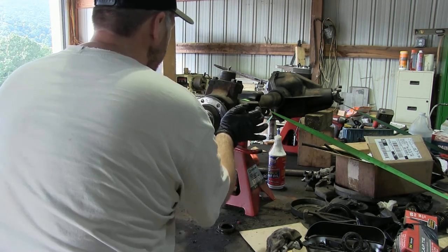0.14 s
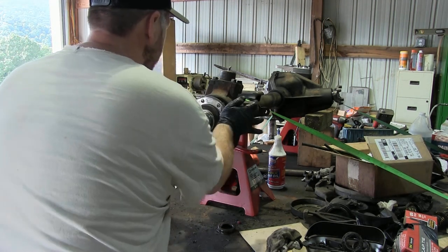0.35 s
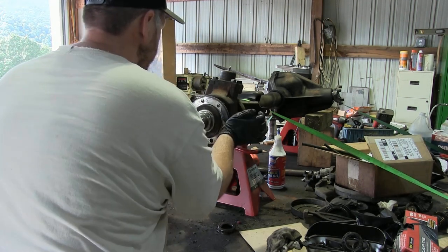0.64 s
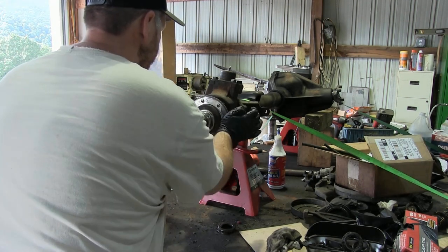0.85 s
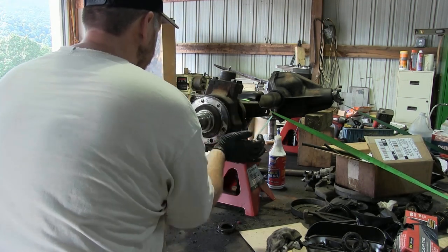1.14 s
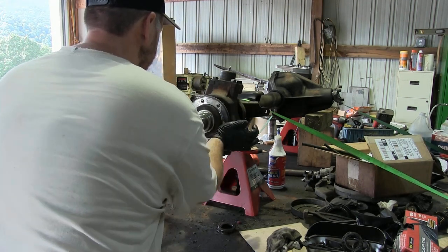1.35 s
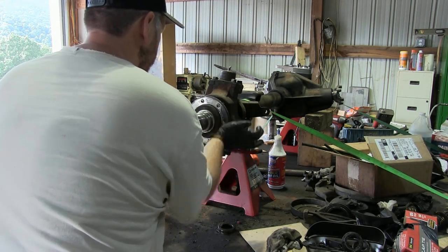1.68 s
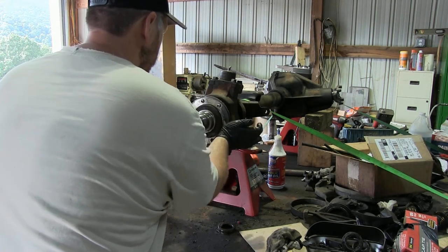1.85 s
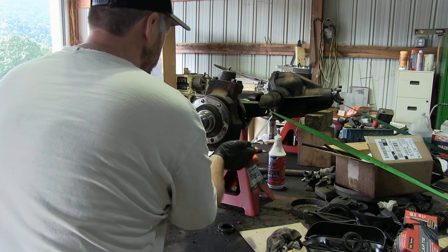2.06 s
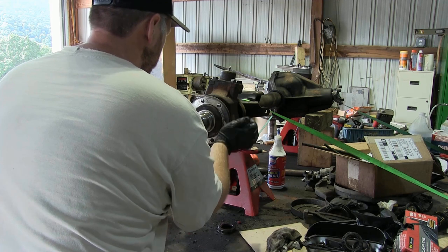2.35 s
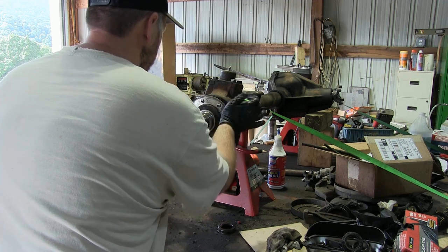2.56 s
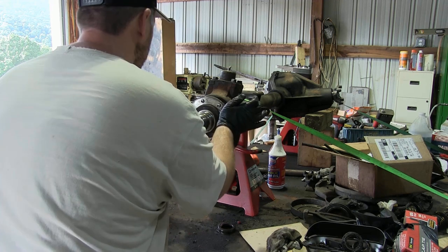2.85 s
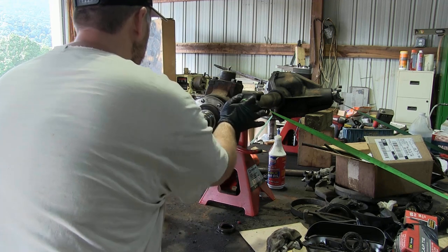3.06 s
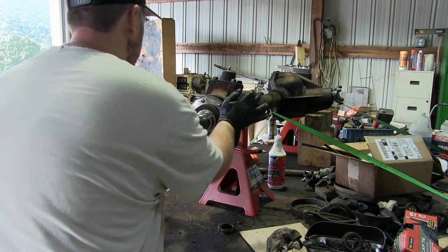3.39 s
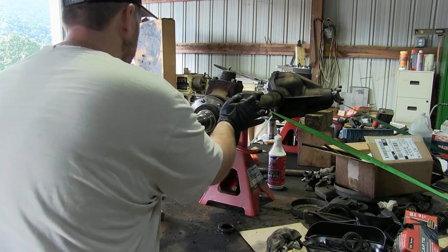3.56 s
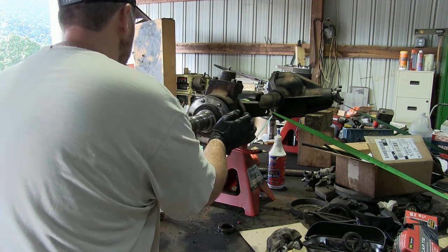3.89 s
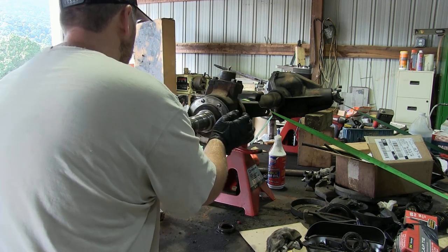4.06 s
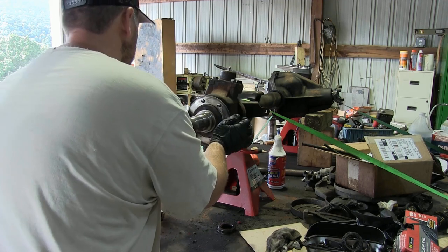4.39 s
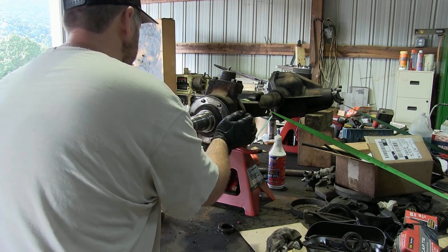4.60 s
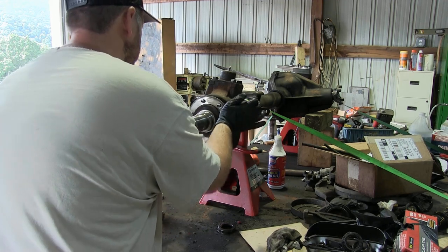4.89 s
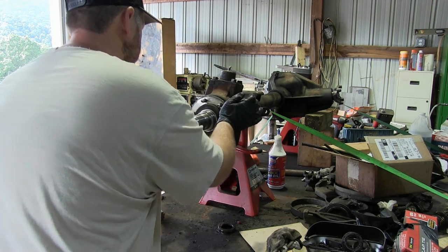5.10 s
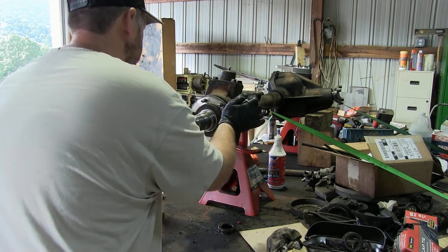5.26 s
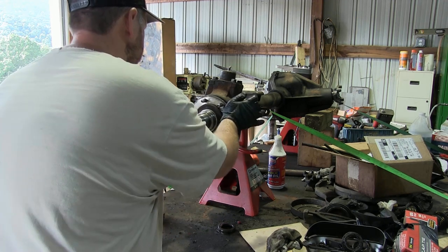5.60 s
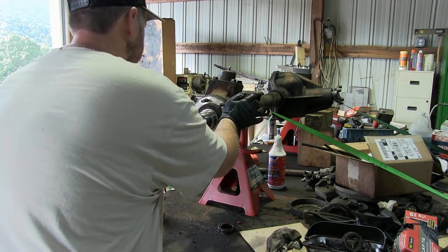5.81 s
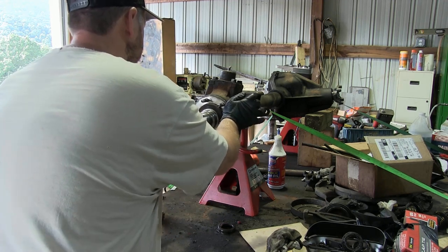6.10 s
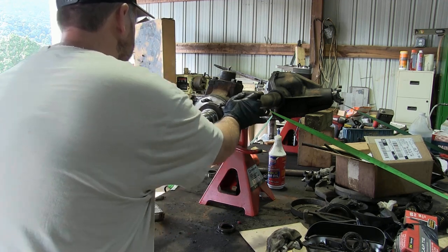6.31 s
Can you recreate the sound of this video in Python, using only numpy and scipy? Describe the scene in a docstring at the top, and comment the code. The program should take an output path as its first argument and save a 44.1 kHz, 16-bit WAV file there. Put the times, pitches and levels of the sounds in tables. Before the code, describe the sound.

Over a steady hiss and a faint hum, heavy steel parts knock together in a reverberant metal shed, heard from nearby. Irregular clunks, often in quick pairs, set an axle housing booming and a hub ringing briefly as it is worked into place. Light scuffs and soft metal rubbing come between them. Near the end a strong triple clunk starts a quicker run of lighter knocks, the last dying into the hiss.

```python
"""A heavy steel hub is pushed and rocked onto a truck axle that rests on stands in a sheet-metal workshop.
A steady hiss and a faint hum are heard from the start. Each shove takes up the play with a tick, then
lands as a clunk, often twice: the impact excites the normal modes of the booming housing and the ringing
steel, and the shed reverberates. From about 3 s faint rubbing joins in at times; after 5 s the blows
crowd together, and the last, light one dies away into the hiss."""
import sys
import numpy as np
from scipy import signal
from scipy.io import wavfile

SR = 44100
rng = np.random.default_rng(int(sys.argv[2]) if len(sys.argv) > 2 else 0)


def log_audio(samples):
    """Write samples as a 16-bit WAV file to the path given in sys.argv[1]."""
    # one column per channel
    frames = np.atleast_2d(samples).T
    # limit to full scale, then quantise
    limited = np.clip(frames, -1, 1)
    pcm = np.round(limited * 32767).astype(np.int16)
    wavfile.write(sys.argv[1], SR, pcm)


N = 284004
TIME, RING_TIME = np.arange(N) / SR, np.arange(int(1.2 * SR)) / SR
BAND_EDGES_HZ = 35 * 2 ** (np.arange(28) / 3)
ANTIPHASE = np.array([[1], [-1]])   # opposite signs on the left and right


def from_db(db):
    """Amplitude ratio: a factor of ten for every 20 dB."""
    return 10 ** (np.asarray(db) / 20)


def at_hz(points, hz):
    """Interpolation on a logarithmic frequency axis."""
    return np.interp(np.log(hz), np.log(np.array(points)[:, 0]), np.array(points)[:, 1])


def decay(t60):
    """Exponential damping: the level falls 60 dB in t60 seconds."""
    return np.exp(-np.log(1000) * RING_TIME / t60)


def rise(time_constant_s):
    """First-order build-up towards full amplitude."""
    return 1 - np.exp(-RING_TIME / time_constant_s)


def add(track, s, sound):
    """Superposition: a sound adds to the track from time s on."""
    start = max(int(s * SR), 0)
    track[:, start:start + sound.shape[-1]] += sound[..., :N - start]


def noise_bands(spectrum, correlation, size):
    """Partially coherent stereo noise as third octaves (centre, band), with a total rms near 1."""
    centres = np.sqrt(BAND_EDGES_HZ[1:] * BAND_EDGES_HZ[:-1])
    gains = from_db(at_hz(spectrum, centres))
    gains /= np.sqrt(np.sum(gains ** 2 * np.diff(BAND_EDGES_HZ)) * 2 / SR)
    white = rng.standard_normal((2, 2, size + SR // 2))
    for k, hz in enumerate(centres):
        sos = signal.butter(2, BAND_EDGES_HZ[k:k + 2], "band", fs=SR, output="sos")
        mid, side = signal.sosfilt(sos, white[k % 2])[:, SR // 2:]
        alike = np.clip(at_hz(correlation, hz), 0, 1)
        mid, side = mid * np.sqrt(1 + alike), side * np.sqrt(1 - alike)
        yield hz, gains[k] * np.array([mid + side, mid - side]) / np.sqrt(2)


def burst(level_db, hz, t60, edge_ratio=1.2, side_share=0.049, rise_share=0.13):
    """A contact transient as damped, band-limited noise; the longer it lasts, the gentler its onset."""
    edges = np.clip([hz / edge_ratio, hz * edge_ratio], 100, .45 * SR)
    sos = signal.butter(3, edges, "band", fs=SR, output="sos")
    envelope = (decay(t60) * rise(rise_share * t60))[:SR // 10]
    mid, side = signal.sosfilt(sos, rng.standard_normal((2, len(envelope))) * envelope)
    gain = from_db(level_db) * np.linalg.norm(envelope) / np.linalg.norm(mid)
    return gain * (mid + side_share * side * ANTIPHASE)


def reverberate(sound, wet_db, t60):
    """Convolution adds the diffuse field of the metal walls, partly coherent between the two sides."""
    left, right, shared = rng.standard_normal((3, len(RING_TIME))) * decay(t60)
    walls = np.array([left, right]) + shared
    walls /= np.linalg.norm(walls, axis=1, keepdims=True)
    return sound + from_db(wet_db) * signal.fftconvolve(sound, walls, axes=1)[:, :N]


# spectrum of the background: (frequency [Hz], relative spectral density [dB])
HISS_SPECTRUM = [(24, -32), (40, -10), (126, -9), (174, -25), (202, -3.5), (438, -15), (472, -3),
                 (548, -10.5), (740, -10.5), (1130, -12), (1280, -20), (2770, -7.5), (5860, -5),
                 (7710, -19), (15500, -34)]
# its left-right likeness: (frequency [Hz], correlation [1])
HISS_CORRELATION = [(100, 0.71), (600, 0.12), (2000, 0.43), (5000, 0.42), (12000, 0.7)]
# its level over time, dipping for a while after 2 s: (time [s], relative level [dB])
HISS_LEVEL = [(0.0, -43.5), (1.74, -43.5), (2.19, -45), (2.58, -45), (3.03, -43.5), (5.56, -43.5),
              (5.74, -41.5), (6.44, -43)]


def hiss(gain_db=3.5):
    """Broadband noise with a continuous spectrum: a bright hiss over a little room rumble."""
    noise = sum(band for _, band in noise_bands(HISS_SPECTRUM, HISS_CORRELATION, size=N))
    course_db = np.interp(TIME, *np.transpose(HISS_LEVEL))
    return from_db(course_db + gain_db) * noise


def hum(hz=477, level_db=-57, waver_hz=2.7):
    """A faint pure tone wavers under slow, random frequency modulation."""
    knots = np.linspace(0, TIME[-1], 60)
    pitch = hz + waver_hz * np.interp(TIME, knots, rng.standard_normal(len(knots)))
    return from_db(level_db) * np.sqrt(2) * np.sin(2 * np.pi * np.cumsum(pitch) / SR)


# sliding while the hub is rocked: (time [s], hold [s], level [dB])
RUBS = [(3.0, .45, -59), (3.52, 0.13, -54), (5.2, 1, -49), (6.15, .3, -51)]


def rubbing(centre_hz=3100, edge_ratio=1.08, side_share=0.64, attack_s=0.17, release_s=0.24):
    """Sliding friction radiates narrow-band noise; each rub swells, holds and fades."""
    sos = signal.butter(2, [centre_hz / edge_ratio, centre_hz * edge_ratio], "band", fs=SR, output="sos")
    mid, side = signal.sosfilt(sos, rng.standard_normal((2, N)))
    swells = [from_db(db) * np.interp(TIME, [s - attack_s, s, s + hold, s + hold + release_s], [0, 1, 1, 0])
              for s, hold, db in RUBS]
    return np.max(swells, axis=0) * (mid + side_share * side * ANTIPHASE) / mid.std()


# steel grazing steel: (time [s], level [dB])
SCUFFS = [(0.915, -46), (2.692, -41), (3.08, -40), (3.502, -40), (5.89, -45)]


def scuffs():
    """Brief friction of steel on steel gives bursts of high-frequency noise."""
    out = np.zeros((2, N))
    for s, level_db in SCUFFS:
        add(out, s, burst(level_db, hz=9900, t60=0.12))
    return out


# loose parts meeting: (time [s], level [dB])
CLACKS = [(0.986, -30), (1.018, -27), (4.4983, -22), (5.5, -25.5), (5.889, -24.5), (6.03, -26)]


def clacks():
    """Light impacts of loose parts give short transients without exciting the housing."""
    out = np.zeros((2, N))
    for s, level_db in CLACKS:
        add(out, s, burst(level_db, hz=1450, t60=0.022))
    return out


# where boom, thud, body, clank and crack lie: (frequency [Hz])
REGISTERS_HZ = [80, 170, 450, 1350, 5000]
ORDINARY_DB = -22   # level of an ordinary blow


def impact_spectrum(hz, level_db, weight_db, hardness_db, rebound):
    """Excitation spectrum relative to a blow's level: weight lifts the thud, hardness the treble."""
    # the stands rock even under a light push, but far less on a rebound
    boom_db = 2 - 0.29 * (level_db - ORDINARY_DB) - (13 if rebound else 0)
    registers_db = [boom_db, weight_db, 0, hardness_db, hardness_db + 4]
    return from_db(np.interp(np.log(hz), np.log(REGISTERS_HZ), registers_db))


def coupling(hz, pitches_hz, boost_db, width_octaves=0.099):
    """Modal coupling: the place of contact drives resonances near two pitches harder than the rest."""
    nearness = np.exp(-.5 * (np.log2(hz[:, None] / pitches_hz) / width_octaves) ** 2)
    return from_db(boost_db * nearness.max(axis=1))


def damped_modes(modes, gains, scatter_db, spread_rad, detune):
    """Free vibration is a sum of damped sines; each blow varies their strength, tuning and stereo phase."""
    hz, db, t60 = np.transpose(modes)
    strength_draw, phase_draw, load_draw = rng.standard_normal((len(hz), 3)).T
    amplitudes = gains * from_db(db + scatter_db * strength_draw)
    hz = hz * (1 + detune * load_draw)
    out = np.zeros((2, len(RING_TIME)))
    for k in range(len(hz)):
        phase = 2 * np.pi * hz[k] * RING_TIME + spread_rad * phase_draw[k] * ANTIPHASE
        out += (-1) ** k * amplitudes[k] * decay(t60[k]) * np.sin(phase)
    return out


# clustered modes of the hub and shaft: (frequency [Hz], relative level [dB], t60 [s])
STEEL_MODES = [(3690, -10, .11), (3770, -4, .13), (3817, -1, .16), (3862, -3, .13), (3915, -7, .1),
               (4027, -13, .35), (4510, -16, .1), (4560, -15, .15), (5100, -25, .2), (7220, -26, .15),
               (7465, -25, .2), (7580, -25, .12), (7690, -23, .14), (7745, -21, .18), (7810, -22, .28),
               (10350, -32, .32), (10405, -33, .2), (10640, -34, .12), (10720, -35, .15), (12400, -41, .25),
               (15320, -42, .25)]


def steel_ring(level_db, pitches_hz, gain_db=-2.5, flash_db=6.5, held_db=-4.0):
    """Close modes beat; the ring flashes while the part bounces free and is held down once it seats."""
    hz = np.array(STEEL_MODES)[:, 0]
    gains = from_db(level_db + gain_db) * coupling(hz, pitches_hz, boost_db=10.5, width_octaves=0.027)
    envelope = rise(0.00047) * (from_db(held_db) + from_db(flash_db) * decay(0.07))
    return envelope * damped_modes(STEEL_MODES, gains, scatter_db=-1.5, spread_rad=0.099, detune=0.0053)


# modes of the axle housing and stands: (frequency [Hz], relative level [dB], t60 [s])
HOUSING_MODES = [(76.2, -15, 0.62), (133.7, -17.5, 1.16), (186, -12, 0.13), (217, -9.5, 0.61),
                 (259, -15, 1.04), (355.7, -21, 1.45), (393.3, -6, 0.68), (455, -0.5, 0.15),
                 (493, -8, 0.69), (575, -15, 0.72), (622.6, -14.5, 0.8), (677, -6.5, 0.27),
                 (832, -14.5, 0.73), (941, -11, 0.15), (990, -17.5, 0.36), (1144, -12, 0.27),
                 (1207, -8, 0.13), (1230, -29.5, 0.91), (1277, -16, 0.51), (1374, -18, 0.49),
                 (1470, -24.5, 0.19), (1730, -46, 0.41)]


def housing_boom(level_db, blow, pitches_hz):
    """Impact excitation sets the low normal modes of the housing and stands ringing."""
    hz = np.array(HOUSING_MODES)[:, 0]
    gains = from_db(level_db) * impact_spectrum(hz, level_db, *blow)
    gains *= coupling(hz, pitches_hz, boost_db=11.0)
    modes = damped_modes(HOUSING_MODES, gains, scatter_db=4.5, spread_rad=0.081, detune=0.0016)
    return rise(0.00067) * modes


# dense vibration of the whole assembly: (frequency [Hz], relative spectral density [dB])
CLUNK_SPECTRUM = [(40, -2), (58, -62), (76, -3), (105, -14.5), (145, -3), (220, 0), (450, 3), (800, -3.5),
                  (1200, -8), (2000, -17.5), (3000, -25.5), (5000, -38), (8000, -42.5), (15000, -75)]
# its left-right likeness: (frequency [Hz], correlation [1])
CLUNK_CORRELATION = [(100, 1), (300, 0.93), (600, 0.81), (2000, 0.76), (4000, 0.91), (12000, 0.94)]
# reverberation time of the shed: (frequency [Hz], t60 [s])
SHED_T60 = [(70, 0.98), (200, 0.74), (450, 0.86), (1000, 0.7), (2500, 0.68), (6000, 0.76), (14000, 0.17)]


def clunk_response(direct_db=4.5, direct_t60=0.15, tail_db=1.0, corner_hz=600, rise_cycles=0.18):
    """Overlapping modes act as noise: lows build up slowly, highs fast, then the room's tail decays."""
    centres, bands = [], []
    for hz, noise in noise_bands(CLUNK_SPECTRUM, CLUNK_CORRELATION, size=len(RING_TIME)):
        direct = from_db(direct_db) * hz / (hz + corner_hz) * decay(direct_t60)
        tail = from_db(tail_db) * decay(at_hz(SHED_T60, hz))
        centres.append(hz)
        bands.append(noise * rise(0.00046 + rise_cycles / hz) * (direct + tail))
    return np.array(centres), np.array(bands)


def clunk(response, level_db, blow, pitches_hz):
    """Source and filter: the spectrum of the blow weights each band of the assembly's response."""
    centres, bands = response
    gains = from_db(level_db) * impact_spectrum(centres, level_db, *blow)
    gains *= coupling(centres, pitches_hz, boost_db=2.5)
    return np.tensordot(gains, bands, 1)


def tick(level_db, hardness_db):
    """Backlash: the play closes with a tiny impact before the shove lands."""
    return burst(level_db + hardness_db + 4.5, hz=2250, t60=0.0036, edge_ratio=2.4)


def snap(level_db, hardness_db, rebound):
    """Nonlinear contact: the snap of the edges outgrows a strong, hard blow and is louder on a rebound."""
    snap_db = -18 + 1.7 * (level_db - ORDINARY_DB) + 1.73 * hardness_db + (4.5 if rebound else 0)
    return burst(snap_db, hz=2300, t60=0.012, edge_ratio=1.81, rise_share=0.069)


# blows of the hub on the axle; weight, hardness and ring are relative to the level:
# (time [s], level [dB], weight [dB], hardness [dB], ring [dB], favoured pitch [Hz], favoured pitch [Hz])
BLOWS = [(0.045, -45, 1.5, -3, -12, 213, 850), (0.4531, -19.5, 4, 1.5, -0.5, 200, 4560),
         (0.477, -25, -1, 0, -22, 583, 990), (0.914, -34, -10, -7.5, -7.5, 560, 660),
         (1.3519, -24, 4, 9.5, 4.5, 632, 1150), (1.82, -20.5, 5, 8, 5, 1046, 4620),
         (1.8579, -24.5, 1, 7.5, 0.5, 1330, 4120), (2.698, -41.5, 9.5, -1.5, -1, 250, 1070),
         (2.745, -52, 3, 7, -10, 217, 258), (3.0858, -31, 6, 7.5, 1.5, 140, 700),
         (3.512, -26, -2.5, -4.5, -12, 590, 895), (3.545, -31.5, -3.5, 2.5, -20, 330, 720),
         (4.1562, -30, 5.5, -0.5, 3, 710, 1480), (4.506, -26, -0.5, 0.5, -3.5, 395, 2100),
         (4.543, -31, 1, -19, -20, 414, 665), (5.053, -21.5, 0.5, 4, 0.5, 378, 1110),
         (5.074, -19.5, -1, -9, -5.5, 392, 7940), (5.1, -20.5, 2.5, 5, -3, 1066, 7750),
         (5.508, -28.5, -3, -5, -7.5, 415, 670), (5.542, -37.5, 14.5, -21, -18, 256, 523),
         (5.629, -33.5, -15, -3.5, -9, 345, 1370), (5.767, -25.5, -9.5, -5.5, -5, 376, 7400),
         (5.798, -30, -4, -1.5, 3, 600, 10300), (5.89, -34, 2.5, -7, -9, 1420, 4520),
         (6.033, -27, 1.5, -6.5, -23, 435, 1300), (6.145, -42.5, 6, -17, -15, 133, 260)]


def hub_impacts(rebound_within_s=0.06, seating_s=0.0055, seating_db=-5, contact_points=4):
    """Each impact excites free vibration; returns the assembly's body, the steel ring and the edges."""
    body, steel, edges = np.zeros((3, 2, N))
    responses = [clunk_response() for _ in range(contact_points)]
    rebounds = np.diff([row[0] for row in BLOWS], prepend=-1) <= rebound_within_s
    seating = from_db(seating_db) * np.linspace(0, 1, int(seating_s * SR)) ** 2
    for k, (s, level_db, weight_db, hardness_db, ring_db, *pitches_hz) in enumerate(BLOWS):
        blow = weight_db, hardness_db, rebounds[k]
        landing = clunk(responses[k % contact_points], level_db, blow, pitches_hz)
        if not rebounds[k]:   # on a rebound the play is already taken up
            add(edges, s - 0.011, tick(level_db, hardness_db))
        # the faces slide before they seat: the clunk's onset, mirrored in time, swells into the blow
        add(body, s - seating_s, seating * landing[:, len(seating):0:-1])
        add(edges, s - 0.0004, snap(level_db, hardness_db, rebounds[k]))
        add(body, s, landing + housing_boom(level_db, blow, pitches_hz))
        add(steel, s, steel_ring(level_db + ring_db, pitches_hz))
    return body, steel, edges


def scene():
    """Superposition of the background, the friction and the impacts with their reverberation."""
    body, steel, edges = hub_impacts()
    ring = reverberate(steel, wet_db=-4, t60=0.59)
    transients = reverberate(scuffs() + clacks() + edges, wet_db=-9, t60=0.8)
    return hiss() + hum() + rubbing() + transients + ring + body


def record(dry, low_cut_hz=69, high_cut_hz=15800):
    """Band limiting and soft saturation: the microphone sheds deep bass, rounds peaks and cuts the top."""
    lean = signal.sosfilt(signal.butter(4, low_cut_hz, "high", fs=SR, output="sos"), dry)
    rounded = lean / (1 + lean ** 4) ** .25
    return signal.sosfilt(signal.ellip(10, .1, 80, high_cut_hz, fs=SR, output="sos"), rounded)


dry = scene()
out = record(dry)
log_audio(out)
```